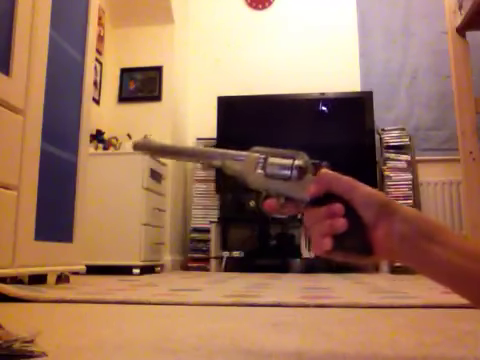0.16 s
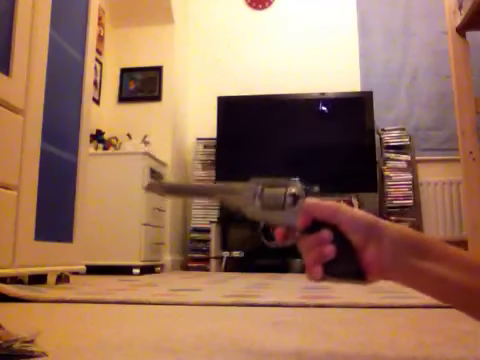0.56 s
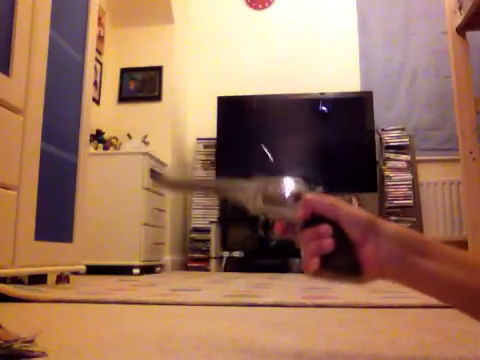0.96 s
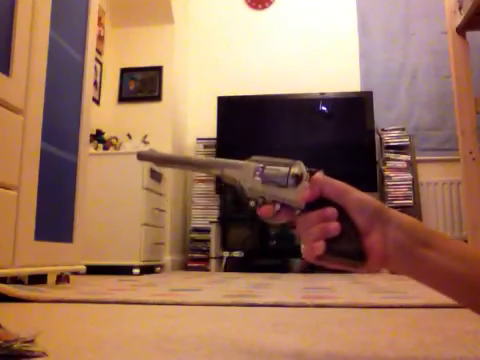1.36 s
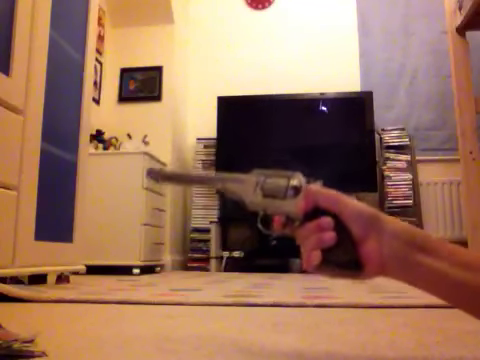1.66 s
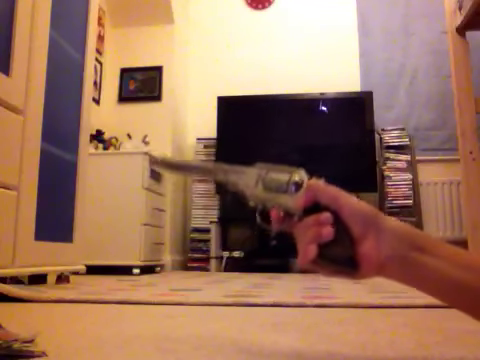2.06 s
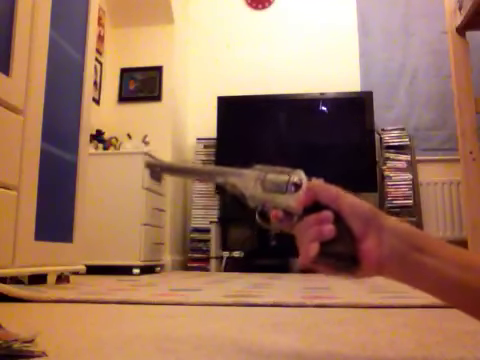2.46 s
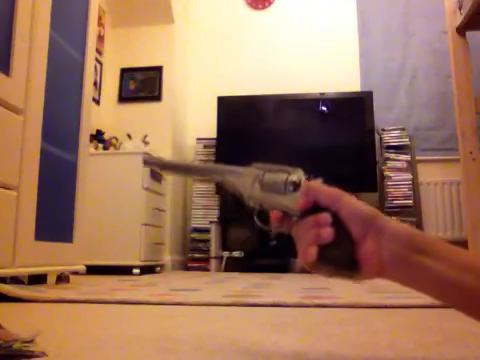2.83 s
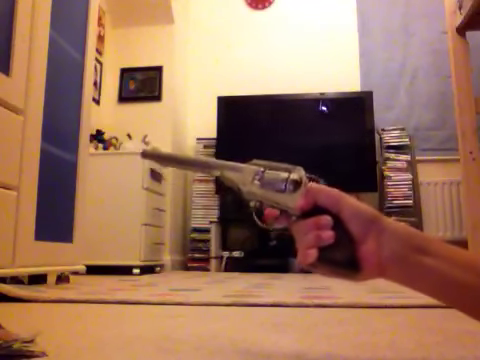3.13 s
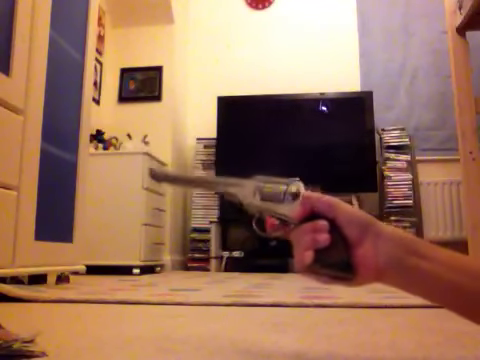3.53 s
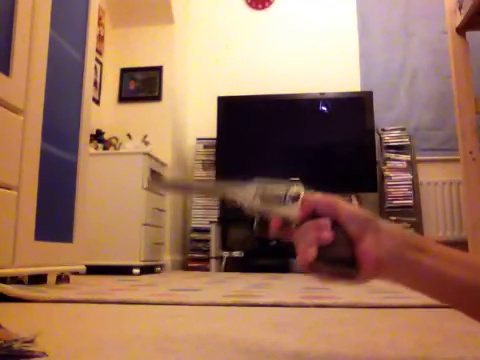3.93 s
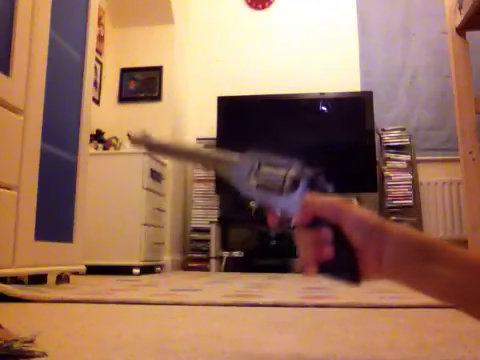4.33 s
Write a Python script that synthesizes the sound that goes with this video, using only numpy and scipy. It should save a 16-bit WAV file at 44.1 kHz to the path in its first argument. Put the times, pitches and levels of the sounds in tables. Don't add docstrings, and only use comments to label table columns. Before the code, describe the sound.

Close, bright hammer snaps and trigger clicks of a toy gun, with two crackling cap shots echoing briefly in a small room.

```python
import sys
import numpy as np
from scipy import signal
from scipy.io import wavfile
from scipy.ndimage import uniform_filter1d

SR = 44100
rng = np.random.default_rng(int(sys.argv[2]) if len(sys.argv) > 2 else 0)


def convert_level_to_amplitude(level_db):
    exponent = np.asarray(level_db, float) / 20
    return 10 ** exponent


def int16_out(signal):
    q = np.round(np.clip(np.atleast_2d(signal).T, -1, 1) * 32767)
    wavfile.write(sys.argv[1], SR, q.astype(np.int16))


N = 198097
HZ = np.fft.rfftfreq(4096, 1 / SR)

# (time [s], blow [dB], grip thud [dB], loudest frame ring [Hz], slip just before it [dB])
HAMMER_FALLS = [
    (0.4795, -13.5, -43.5, 1910, -35.5),
    (1.554, -11, -45.5, 2650, -47.5),
    (1.9452, -14.5, -39.5, 2025, -50),
    (2.3433, -12.5, -29, 1940, -41.5),
    (3.1987, -13.5, -60, 2500, -48),
    (3.5857, -14.5, -53.5, 2345, -51),
    (3.954, -13, -45.5, 2720, -49.5),
    (4.3723, -15, -42.5, 2170, -47),
]
# (time [s], snap [dB], grip thud [dB], loudest frame ring [Hz], slip before it [dB])
TRIGGER_SNAPS = [
    (0.6909, -23, -55.5, 1770, -53.5),
    (1.1591, -27.5, -53, 2000, -59),
    (1.7431, -23, -49.5, 1966, -50),
    (2.1369, -21, -49.5, 6660, -49.5),
    (2.528, -27.5, -48.5, 2030, -52.5),
    (2.9059, -28.5, -54.5, 2027, -59),
    (3.3772, -21.5, -49, 2227, -49),
    (3.7698, -21, -45, 2415, -56),
    (4.1678, -20.5, -41.5, 1910, -50.5),
]
# (time [s], level [dB], lead of its creep [s], loudest frame ring [Hz])
SEAR_RELEASES = [
    (0.4555, -42.5, .0095, 1310),
    (0.9391, -36.5, 0.0083, 1150),
    (1.516, -53, 0.0057, 1198),
    (1.920, -41, 0.01, 1150),
    (2.317, -45.5, .005, 1150),
    (2.704, -40, .011, 1783),
    (3.1671, -46.5, 0.013, 1203),
    (3.5611, -44, 0.0058, 1150),
    (3.9313, -40, 0.0083, 1678),
    (4.352, -36.5, 0.011, 1700),
]
# (frequency [Hz], level [dB per Hz])
HAMMER_COLOUR = [(100, -46.5), (500, -27.5), (1000, -22.5), (1500, -12.5), (2500, -15), (4700, -3.5),
                 (7100, -7), (10000, -7), (12700, -3.5), (15000, -9), (16000, -17)]
# (frequency [Hz], level [dB per Hz])
SEAR_COLOUR = [(59, -59), (100, -30.5), (736, -10.5), (1870, -1.5), (2580, -8), (3780, -4), (12700, -12),
               (15000, -8.5), (16000, -18.5)]
# (frequency [Hz], width [Hz], level [dB])
HAMMER_FRAME = [(1860, 120, 7.5), (2770, 220, 3), (3580, 410, 5), (4600, 440, 0), (9354, 1200, 5.5),
                (12240, 170, 2)]
# (frequency [Hz], width [Hz], level [dB])
TRIGGER_FRAME = [(1720, 130, 2.3), (2580, 400, 9.9), (3800, 360, 7.7), (5350, 3000, 2.3), (10850, 150, 4)]
# (frequency [Hz], level [dB], time to fall 60 dB [s])
TRIGGER_KNOCK = [(380, -1, 0.016), (653, 4, 0.028), (920, -4, .012), (1090, -1, .016)]
# (frequency [Hz], level [dB], time to fall 60 dB [s])
PAWL_KNOCK = [(1150, 0.5, .011), (1458, -1, .011), (1800, -1.5, .011)]
# (frequency [Hz], level [dB])
CLICK_ECHO = [(100, -17.5), (700, -15.5), (1300, -14.5), (2500, -3), (5000, -11), (9000, -6),
              (15000, -12.5)]


def evened(x):
    return x / np.sqrt(np.mean(x ** 2) + 1e-20)


def read(points, hz):
    f, value = np.transpose(points)
    return np.interp(np.log(hz + 1), np.log(f + 1), value)


def add(mix, s, sound):
    part = mix[round(s * SR):][:len(sound)]
    part += sound[:len(part)]


def causal(gain_db):
    log_gain = np.log(convert_level_to_amplitude(np.maximum(gain_db, -100)))
    circle = np.r_[log_gain, log_gain[-2:0:-1]]
    spectrum = np.exp(np.conj(signal.hilbert(circle)))
    return np.fft.ifft(spectrum).real[:len(gain_db)]


def coloured(x, points):
    return signal.oaconvolve(x, causal(read(points, HZ)))[:len(x)]


def bumps(modes):
    return sum(db / (1 + (2 * (HZ - hz) / width) ** 2) for hz, width, db in modes)


def room(walls_db, lasting, patchy_db=1.0, onset_s=0.012, build_s=0.003):
    # (frequency [Hz], time [s])
    decay_times = [(60, 0.26), (250, 0.24), (700, .33), (1500, 0.3), (3000, 0.29), (7000, 0.26),
                   (14000, .24)]
    # (frequency [Hz], level [dB])
    hallway = [(300, -28), (1500, -15), (3000, -17.5), (6000, -20), (12000, -34.5)]
    # (delay [s], level [dB])
    wall_echoes = [(0.0132, 4), (0.0161, 6), (0.0185, -4), (.020, 6.5), (.0255, -4), (0.0368, -7.5)]
    taps = np.zeros(SR)
    at = np.arange(0, SR - 5, 5)
    taps[at + rng.integers(0, 5, len(at))] = rng.standard_normal(len(at))

    hz, t, z = signal.stft(taps, SR, nperseg=256)
    dying_db = -60 * t / (lasting * read(decay_times, hz))[:, None]
    slow = convert_level_to_amplitude(read(hallway, hz)[:, None] + 0.47 * dying_db)
    patches = uniform_filter1d(rng.standard_normal(z.shape), size=3, axis=0)
    patches = evened(uniform_filter1d(patches, size=6, axis=1))
    z = z * (convert_level_to_amplitude(dying_db) + slow) * convert_level_to_amplitude(patchy_db * patches)
    tail = signal.istft(z, SR, nperseg=256)[1][:SR]
    tail = tail / (1 + np.exp(-np.clip((np.arange(SR) / SR - onset_s) / build_s, -30, 30)))
    tail = tail / np.linalg.norm(tail)

    walls = np.zeros(SR)
    for s, db in wall_echoes:
        smear = rng.standard_normal(100) * np.exp(-(np.arange(100) / SR / 0.0018) ** 2)
        add(walls, s, convert_level_to_amplitude(db + walls_db) * smear / np.linalg.norm(smear))
    return tail + signal.lfilter([.4], [1, -.6], walls)


def contact(blow_s, rattle_s, rattle_db, slip_s, slip_db, rise_s=.0001, floor_s=.0038, floor_db=-15):
    t = np.arange(1600) / SR - slip_s
    after = np.maximum(t, 0)
    rattle = np.exp(-(after / rattle_s) ** 3) * (t >= 0)
    blow = np.exp(-(after / blow_s) ** 2) * (t >= 0)
    bounce = np.roll(blow, round(floor_s * SR))
    slip = np.exp(-(t + slip_s) / 0.0017)
    shape = blow + convert_level_to_amplitude(floor_db) * bounce + convert_level_to_amplitude(rattle_db) * rattle + convert_level_to_amplitude(slip_db) * slip
    rise = 1 - np.exp(-(t + slip_s) / rise_s)
    uneven = convert_level_to_amplitude(2.5 * np.repeat(rng.standard_normal(100), 16))
    return rise * shape * uneven * rng.standard_normal(1600)


def thud(grip):
    t = np.arange(2000) / SR
    knock = 0
    for hz, db, t60 in grip:
        louder, higher = rng.standard_normal(2)
        level = convert_level_to_amplitude(db + 2.5 * louder - 60 * t / t60)
        knock = knock + level * np.sin(2 * np.pi * hz * (1 + .04 * higher) * t)
    return knock * np.exp(-(t / 0.0099) ** 4) * (1 - np.exp(-(t / 0.0013) ** 2))


def clicks(rows, tone, ring, grip, slip_s, body_db, room_db, ring_db=8, **force):
    # (frequency [Hz], width [Hz], level [dB])
    frame_afar = [(1860, 440, 1), (2500, 500, -0.04), (5460, 2200, 0), (13900, 1200, 1.5)]
    near, knocks, sent = np.zeros((3, N))
    colour_db = read(tone, HZ) + read([(2500, body_db), (5000, 0)], HZ)
    for s, db, thud_db, ring_hz in rows:
        frame = causal(colour_db + bumps(ring + [(ring_hz, 170, ring_db)]))
        sound = signal.fftconvolve(contact(slip_s=slip_s, **force), frame)
        loudest = np.sqrt(uniform_filter1d(sound ** 2, 88).max())
        add(near, s - slip_s, sound * convert_level_to_amplitude(db) / loudest)
        add(knocks, s, convert_level_to_amplitude(thud_db) * thud(grip))
        all_round = causal(colour_db + bumps(frame_afar + [(ring_hz, 350, ring_db)]))
        add(sent, s, convert_level_to_amplitude(db + room_db) * all_round / np.linalg.norm(all_round))
    return np.array([near, knocks, sent])


def ticks(rows, thud_db, ring_hz):
    return [(s, db, db + thud_db, ring_hz) for s, db in rows]


def earlier():
    # (time before the start [s], level [dB])
    past_click = (0.085, 0.58)
    lead_s, db = past_click
    snap = causal(read(HAMMER_COLOUR, HZ) + read(CLICK_ECHO, HZ) + bumps([(920, 1600, 13)]))
    tail = signal.fftconvolve(snap / np.linalg.norm(snap), room(walls_db=-40, lasting=0.78))
    return np.pad(convert_level_to_amplitude(db) * tail[round(lead_s * SR):], (0, N))[:N]


def floor():
    # (frequency [Hz], level [dB per Hz])
    hiss_colour = [(60, -33), (100, -20.5), (140, -15.5), (220, -14.5), (300, -12.5), (600, -13.5),
                   (1040, -16.5), (1400, -11), (2100, -15.5), (4500, -16.5), (8000, -20), (12500, -18),
                   (15000, -17.5), (16000, -34.5)]
    # (frequency [Hz], width [Hz], level [dB])
    hum_tones = [(107, 2.5, -86), (174, 52, -82), (268, 9.3, -89)]
    frames, hz = N // 256 + 5, np.fft.rfftfreq(1024, 1 / SR)
    a, b, patches = rng.standard_normal((frames, 513, 3)).T
    patches = evened(uniform_filter1d(uniform_filter1d(patches, 12, 0), 14, 1))
    z = (a + 1j * b) * convert_level_to_amplitude(read(hiss_colour, hz)[:, None] + 0.79 * patches)
    hiss = signal.istft(z, nperseg=1024, noverlap=768)[1][:N]
    out = convert_level_to_amplitude(-74.5) * evened(hiss)
    t = np.arange(N) / SR
    for hum_hz, width, db in hum_tones:
        noise = rng.standard_normal((N, 2)) @ [1, 1j]
        waver = signal.lfilter([1], [1, -np.exp(-np.pi * width / SR)], noise)
        hum = (1.1 + waver / abs(waver).mean()) * np.exp(2j * np.pi * hum_hz * t)
        out = out + convert_level_to_amplitude(db) * evened(hum.real)
    return out


def pawl():
    # (time [s], level [dB])
    drum_ticks = [(.285, -69.5), (.339, -61), (.816, -61), (.842, -50.5), (1.288, -76), (1.405, -57),
                  (1.528, -57), (1.706, -55.5), (1.827, -52), (2.087, -58.5), (2.224, -54.5), (2.475, -65),
                  (2.606, -56.5), (2.69, -58.5), (3.062, -65.5), (3.133, -69), (3.33, -62), (3.474, -58),
                  (3.839, -53), (4.097, -59), (4.2515, -48), (4.274, -61), (4.472, -76.5)]
    # (frequency [Hz], level [dB per Hz])
    pawl_colour = [(59, -52.5), (100, -24), (595, -24), (1060, -13.5), (2130, 5), (4200, -5.5),
                   (10200, -17), (15000, -30), (16000, -48.5)]
    rows = ticks(drum_ticks, thud_db=2.0, ring_hz=1768)
    return clicks(rows, pawl_colour, TRIGGER_FRAME, PAWL_KNOCK, slip_s=0.00022, body_db=1.9, room_db=18.5,
                  blow_s=0.00059, rattle_s=0.0039, rattle_db=-12, slip_db=-26)


def creep():
    # (time [s], level [dB])
    stray = [(.441, -67), (.464, -64), (2.298, -57.5), (2.468, -60), (2.489, -59), (2.7245, -45.5),
             (3.017, -62.5), (3.337, -57), (3.546, -55.5), (3.725, -58.5), (3.732, -53.5), (3.9297, -48)]
    # (time ahead [s], level against the row's slip [dB])
    spring_slips = [(.0117, -0.5), (.0078, -1.5)]
    # (frequency [Hz], level [dB per Hz])
    creep_colour = [(200, -29), (800, -18), (1800, -3), (4000, -4), (7000, -5), (12000, -15),
                    (16000, -28.5)]
    sear_slips = [(s - lead_s, -59) for s, db, lead_s, hz in SEAR_RELEASES]
    graze = [(row[0] - 0.006, row[-1]) for row in HAMMER_FALLS]
    spring = [(row[0] - lead_s, row[-1] + db) for row in TRIGGER_SNAPS for lead_s, db in spring_slips]
    rows = ticks(stray + sear_slips + graze + spring, thud_db=-27.0, ring_hz=5200)
    return clicks(rows, creep_colour, TRIGGER_FRAME, TRIGGER_KNOCK, slip_s=0.00086, body_db=-1.1, room_db=13.0,
                  blow_s=.001, rattle_s=.005, rattle_db=-1.5, slip_db=-29.0, rise_s=.0015)


def sear():
    rows = [(s, db, db - 17.5, hz) for s, db, lead_s, hz in SEAR_RELEASES]
    return clicks(rows, SEAR_COLOUR, HAMMER_FRAME, PAWL_KNOCK, slip_s=0.00015, body_db=-2.6, room_db=23.0,
                  blow_s=0.001, rattle_s=0.0069, rattle_db=-9.0, slip_db=-15.5, rise_s=0.0019)


def hammer():
    # (frequency [Hz], level [dB], time to fall 60 dB [s])
    hammer_knock = [(181, 0, 0.045), (324.3, -1.5, 0.025), (557, -2, 0.02), (1150, -2.5, 0.037)]
    rows = [row[:-1] for row in HAMMER_FALLS]
    return clicks(rows, HAMMER_COLOUR, HAMMER_FRAME, hammer_knock, slip_s=.0022, body_db=1.55, room_db=17.0,
                  blow_s=.0012, rattle_s=0.0071, rattle_db=-10.0, slip_db=-14.5, floor_db=-18.0)


def trigger():
    # (frequency [Hz], level [dB per Hz])
    trigger_colour = [(100, -53.5), (600, -34), (1170, -5), (2080, -10), (4470, -5.5), (6020, 2.5),
                      (8280, -4.5), (13500, 0), (15000, -6.5), (16000, -40.5)]
    rows = [row[:-1] for row in TRIGGER_SNAPS]
    return clicks(rows, trigger_colour, TRIGGER_FRAME, TRIGGER_KNOCK, slip_s=0.001202, body_db=-1.3, room_db=18.0,
                  blow_s=0.00081, rattle_s=0.0054, rattle_db=-8, slip_db=-11, floor_db=-41, rise_s=0.00098)


def caps(burn_s=0.0044, fade_s=0.0027, front_db=3.5, hammer_db=-24):
    # (time [s], blast [dB], room share [dB])
    bangs = [
        (0.9586, -6.5, 2),
        (2.7286, -5.5, 0.5),
    ]
    # (frequency [Hz], level [dB per Hz])
    blast_colour = [(18, -40), (60, -17.5), (780, -9), (1100, -7.5), (2350, -7), (3580, -7), (4780, -8),
                    (6050, -9), (6720, -7.5), (13700, -13.5), (16000, -28.5)]
    near, sent, t = np.zeros(N), np.zeros(N), np.arange(2000) / SR
    crack = causal(read(blast_colour, HZ))
    u = t / 0.00041
    front = convert_level_to_amplitude(front_db) * (1 - u) * np.exp(-u)
    burning = np.exp(-np.maximum(t - burn_s, 0) / fade_s) * np.minimum(0.53 + t / 0.009, 1)
    for s, db, room_db in bangs:
        sputter = burning * evened(coloured(rng.standard_normal(2000), blast_colour))
        add(near, s, convert_level_to_amplitude(db) * (front + sputter))
        touch = np.exp(-t / .003) * evened(coloured(rng.standard_normal(2000), SEAR_COLOUR))
        add(near, s - .0025, convert_level_to_amplitude(db + hammer_db) * touch)
        add(sent, s, convert_level_to_amplitude(db + room_db) * crack / np.linalg.norm(crack))
    return near, sent


def rustle():
    # (start [s], length [s], level [dB])
    brush = (2.372, 0.15, -66)
    # (frequency [Hz], level [dB per Hz])
    cloth_colour = [(120, -22), (250, -2), (500, 0), (800, -8), (1300, -19)]
    start, length, db = brush
    u, out = np.arange(0, 1, 1 / (SR * length)), np.zeros(N)
    lumps = convert_level_to_amplitude(2.6 * evened(uniform_filter1d(rng.standard_normal(SR), size=400)))
    cloth = evened(coloured(lumps * rng.standard_normal(SR), cloth_colour))
    add(out, start, convert_level_to_amplitude(db) * np.sin(np.pi * u ** 0.52) * cloth[:len(u)])
    return out


def scene():
    # (frequency [Hz], level [dB])
    blast_echo = [(40, -20), (200, 7), (450, -3), (900, -4), (2000, 2.5), (5000, 3.5), (9000, 2.5),
                  (15000, 1.5)]
    lock, knocks, lock_sent = pawl() + creep() + sear() + hammer() + trigger()
    blast, blast_sent = caps()

    sway = np.pi * np.arange(N) / SR * 2.3
    lock_sent = coloured(lock_sent, CLICK_ECHO)
    lock_room = np.zeros(N)
    for share in (np.sin(sway), np.cos(sway)):
        lock_room += signal.fftconvolve(lock_sent * share, room(walls_db=-15.5, lasting=0.7))[:N]

    blast_sent = coloured(blast_sent, blast_echo)
    blast_room = convert_level_to_amplitude(18.5) * signal.fftconvolve(blast_sent, room(walls_db=-7.0, lasting=0.83))[:N]
    return (lock + knocks + lock_room + blast + blast_room + earlier() + floor() + rustle())[None]


def roll_off(x):
    return signal.sosfilt(signal.butter(12, 16480, fs=SR, output="sos"), x)


def record(dry):
    ceiling = .58
    squeezed = dry / (1 + abs(dry / ceiling) ** 3.8) ** (1 / 4.8)
    low_cut = signal.butter(3, 100, "high", fs=SR, output="sos")
    thin = signal.sosfilt(low_cut, squeezed)
    high_cut = signal.firwin(127, 15500, window=("kaiser", 4), fs=SR)
    limited = signal.oaconvolve(thin, high_cut[None], "same")
    return roll_off(limited)


dry = scene()
out = record(dry)
int16_out(out)
```